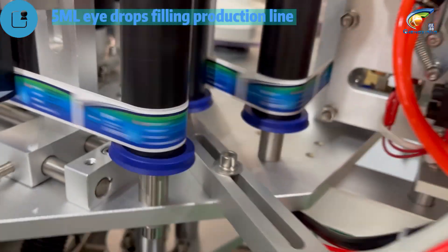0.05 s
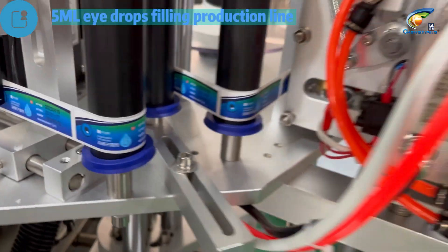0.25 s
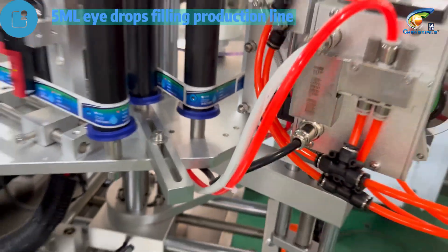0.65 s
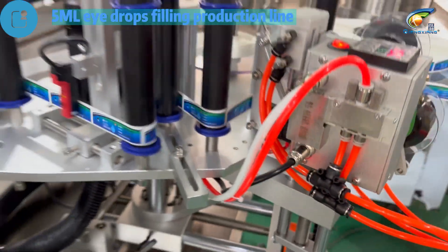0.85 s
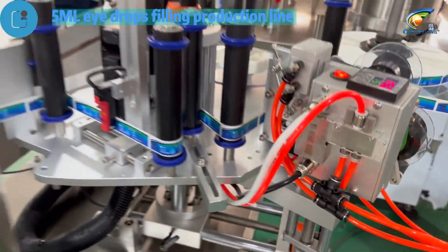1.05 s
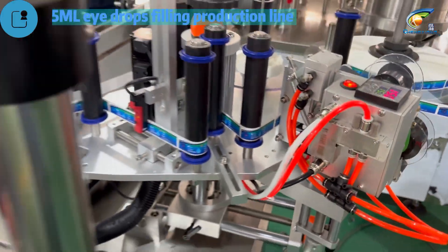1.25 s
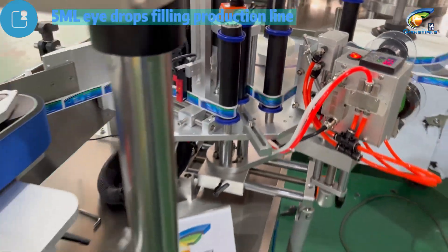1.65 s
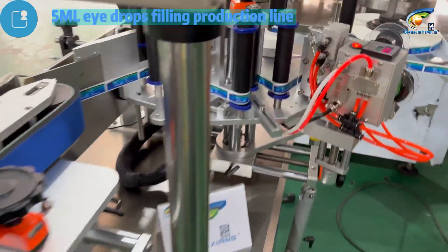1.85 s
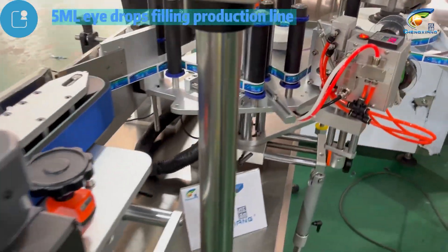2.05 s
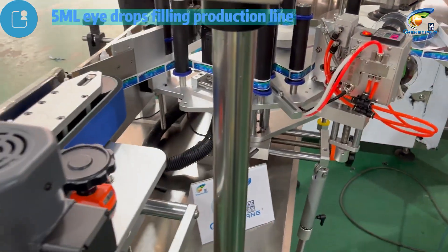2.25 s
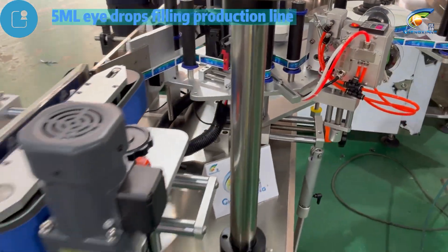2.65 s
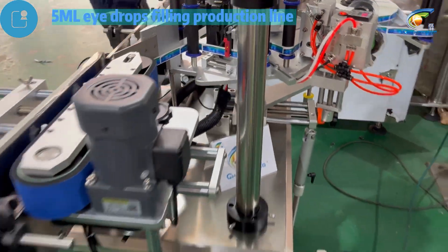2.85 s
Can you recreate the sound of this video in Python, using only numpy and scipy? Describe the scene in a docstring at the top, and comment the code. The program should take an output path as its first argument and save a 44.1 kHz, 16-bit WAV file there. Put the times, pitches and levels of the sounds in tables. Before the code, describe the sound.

A pneumatic labelling machine spits air and clacks in regular pairs over a factory hum.

```python
"""Label tape squeaks and hisses off its reel over the hum of a factory hall: a pneumatic labelling machine,
close to a stereo microphone, runs four cycles. In each, a valve spits air and a piston rattles out and
thuds; the valve spits again, the frame thumps and the piston clacks home on its ringing steel stop.
Small parts tick in between. A hollow knock follows the first cycle, a thin squeal the second,
and the hall echoes softly behind the machine."""
import sys
import numpy as np
from scipy import signal
from scipy.fft import rfft, irfft
from scipy.io import wavfile
from scipy.ndimage import uniform_filter1d

SR = 44100
rng = np.random.default_rng(int(sys.argv[2]) if len(sys.argv) > 2 else 0)


def int16_out(signal):
    """Quantize to a 16-bit WAV file."""
    q = np.round(np.clip(np.atleast_2d(signal).T, -1, 1) * 32767)
    wavfile.write(sys.argv[1], SR, q.astype(np.int16))


N = 127890

# hum of the hall (frequency [Hz], level [dB])
HUM_SPECTRUM = [(25, -43), (40, -5.5), (60, 1), (135, -0.5), (200, -8.5), (480, -7.5), (800, -13),
                (3800, -22), (6500, -30.5), (15000, -30.5), (16000, -54)]
# its rise and fall (time [s], level [dB])
HUM_LEVEL = [(0, -36.5), (.45, -44.5), (.72, -40), (1.2, -39.5), (1.6, -40), (2.5, -41.5), (2.75, -37.5),
             (2.9, -38)]
# dull bumps along the conveyor (time [s], level [dB])
BUMP_HITS = [(2.268, -37.5), (2.406, -30)]
# noise of a bump (frequency [Hz], level [dB])
BUMP_SPECTRUM = [(150, -45), (650, 19), (2200, 1), (12000, -58)]
# ticks of the mechanism (time [s], click [dB], ring [dB])
TICK_HITS = [(.2475, -28.5, -24), (.264, -34, -25), (.272, -41, -33), (.851, -32.5, -28), (1.014, -26, -27),
             (1.0205, -36, -31), (1.683, -32.5, -23), (1.835, -29, -28), (2.436, -32, -25)]
# click of a tick (frequency [Hz], level [dB])
TICK_SPECTRUM = [(300, -2.5), (3700, 3.5), (5000, -4.5), (15000, -5)]
# light metal parts that tick (frequency [Hz], level [dB], t60 [s])
SMALL_PART_MODES = [(2050, -6, .065), (2950, -13, .04), (3650, -11, .045)]
# tones of the squeal (frequency [Hz], level [dB])
SQUEAL_PARTIALS = [(1470, -52), (2121, -49), (2606, -53), (3376, -48), (3590, -51), (3948, -46),
                   (4091, -49), (6352, -53), (9380, -52), (9510, -52)]
# swell of the squeal (time [s], gain [dB])
SQUEAL_SWELL = [(1.16, -50), (1.19, 0), (1.34, 2), (1.42, -7), (1.58, -12), (1.68, -45)]
# hollow knock and its bounce (time [s], relative level [dB])
KNOCK_HITS = [(.5445, -12), (.607, -28)]
# ring of the knock (frequency [Hz], level [dB], t60 [s])
HOLLOW_MODES = [(447, -12, .11), (485, -22, .07), (954, 0, .075), (1075, -17, .06), (1206, -24, .08)]
# tape slipping on its rollers (time [s], length [s], start pitch [Hz], end pitch [Hz], level [dB])
TAPE_SQUEAKS = [(.03, 0.023, 3750, 4150, -43.5), (0.049, 0.019, 3890, 3400, -38.5),
                (0.111, .05, 3750, 3400, -44.5)]
# tape leaving the reel (frequency [Hz], level [dB])
TAPE_SPECTRUM = [(500, 2), (3500, -1.5), (15300, 3.5), (16000, -28)]
# thin hiss between strokes (time [s], level [dB])
IDLE_HISS_LEVEL = [(.28, -84), (.36, -57), (.5, -50.5), (.68, -66), (1.1, -41.5), (1.2, -42), (1.35, -51.5),
                   (1.5, -62), (2.3, -61.5), (2.6, -47.5)]
# outward strokes (time [s], air [dB], air treble [dB], thud [dB], relative slide [dB], tape [dB])
OUT_STROKES = [(0.2033, -18.5, -11, -12.5, -25.5, -41), (.9440, -15, -15, -14.5, -24.5, -43),
               (1.771, -17, -19.5, -16, -36, -47), (2.525, -20.5, -16, -19.5, -38.5, -50.5)]
# sliding piston (frequency [Hz], level [dB])
SLIDE_SPECTRUM = [(100, -13), (400, 9), (1200, 2.5), (3200, 0), (6000, -17.5), (15000, -17)]
# frame shoved by the piston (frequency [Hz], level [dB], t60 [s])
FRAME_SHOVE_MODES = [(55.5, -11, 0.17)]
# thud of the piston landing (frequency [Hz], level [dB], t60 [s])
LANDING_MODES = [(146.7, -8, 0.39), (307.2, -3, 0.099), (536, -11.5, 0.12), (886, -20, 0.038)]
# return strokes (time [s], air [dB], air treble [dB], air hold [s], thump [dB], clack delay [s],
# clack [dB], clack treble [dB], rebound gain [dB])
HOME_STROKES = [(0.3211, -14.5, -13.5, 0.0045, -11, .026, -12, -18, -12.5),
                (1.0622, -17, -18, 0.0027, -15.5, 0.025, -15.5, -17, -11),
                (1.8884, -22.5, -23, 0.006, -19, .026, -23, -22, -4.5),
                (2.642, -23, -21.5, 0.0057, -22, 0.025, -22.5, -24, -7)]
# frame ringing after the return (frequency [Hz], level [dB], t60 [s])
FRAME_RING_MODES = [(147.6, -22, 0.61)]
# piston clacking home (frequency [Hz], level [dB], t60 [s])
HOME_MODES = [(528, 3.5, 0.052), (598.6, -5, 0.19), (668, -2, 0.077), (838, -2.5, 0.077), (937, 8.5, 0.025),
              (1138, -2.5, 0.1)]
# steel stop (frequency [Hz], level [dB], t60 [s])
STEEL_STOP_MODES = [(1545, -8, 0.057), (1766, -21, .1), (1987, -6.5, 0.09), (2600, -15, .084),
                    (2824, -6.5, 0.088), (3380, -13, 0.048)]
# body of the clack (frequency [Hz], level [dB])
CLACK_SPECTRUM = [(100, 5), (600, 2), (1500, 1.5), (3000, -6), (6000, -31), (15000, -36)]
# bright edge of the clack (frequency [Hz], level [dB])
CLACK_TOP_SPECTRUM = [(700, 3), (2000, -1.5), (3200, 0.5), (7000, -0.5), (8500, 2), (15500, -11)]
# body of the air jet (frequency [Hz], level [dB])
AIR_SPECTRUM = [(100, -1.5), (350, 3.5), (900, -5.5), (2000, -8.5), (2900, 1.5), (6300, -3), (8300, 1),
                (11000, -20)]
# treble of the air jet (frequency [Hz], level [dB])
AIR_TOP_SPECTRUM = [(3000, -30.5), (9000, -8.5), (10500, -0.5), (14500, 4), (15500, 3), (16000, -35)]
# stereo width at the microphone (frequency [Hz], side against mid [dB])
STEREO_WIDTH = [(60, -26), (150, -16), (350, -11), (1100, 1), (2200, -6.5), (4500, -2.5), (9000, -20.5)]
# phase between the microphone ports (frequency [Hz], lead of the left [rad])
MIC_PHASE = [(0, 0), (4000, 0), (5100, 1.3), (6000, -.5), (8200, -3.14), (10700, -5.6), (12800, -6.7),
             (15200, -9.2)]
# balance of the microphone (frequency [Hz], left minus right [dB])
MIC_BALANCE = [(400, 0.3), (1350, -3), (1850, 0), (3900, .3), (5500, 2.6), (9000, -.5)]

ECHO_DB, ECHO_T60_S, ECHO_TREBLE_T60_S = -17.5, 0.92, 0.44
PLATE_LOW_HZ, PLATE_HIGH_HZ, PLATE_DAMP_HZ, PLATE_T60_S, PLATE_DB = 1202, 14100, 7000, 0.18, -8
TAPE_LEAD_S, TAPE_HOLD_S = 0.18, 0.21
SHOVE_DELAY_S, SLIDE_DELAY_S, THUD_DELAY_S, REBOUND_S = 0.0057, 0.015, 0.028, 0.016
AIR_RISE_S, OUT_AIR_HOLD_S, OUT_SPOOL_LEAD_S, HOME_SPOOL_LEAD_S = 0.00097, 0.0025, 0.0095, 0.013
HOME_TAIL_DB, HOME_KICK_DB = -5, -11.5
LOW_CUT_HZ, HIGH_CUT_HZ = 32, 16000


def undb(db):
    """Decibels to gain."""
    return 10 ** (np.asarray(db) / 20)


def clock():
    """Time of each sample."""
    return np.arange(N) / SR


def bins():
    """Frequencies of the spectrum, raised by 1 Hz to avoid zero."""
    return np.arange(N // 2 + 1) * SR / N + 1


def curve(points):
    """Gain that follows (time [s], level [dB]) points."""
    return undb(np.interp(clock(), *np.array(points).T))


def colour(points, hz):
    """Gain at hz along (frequency [Hz], level [dB]) points."""
    at, db = np.array(points).T
    return undb(np.interp(np.log(hz), np.log(at), db))


def noise(spectrum):
    """Stereo noise of rms 1 with the given spectral shape."""
    mid, side = rfft(rng.standard_normal((2, N))) * colour(spectrum, bins())
    side = side * colour(STEREO_WIDTH, bins())
    out = irfft(np.array([mid + side, mid - side]), N)
    return out / out.std()


def waver(per_s):
    """Smooth random wavering with a spread near 1."""
    step = int(SR / per_s)
    steps = np.repeat(rng.standard_normal(N // step + 1), step)
    return 1.19 * uniform_filter1d(uniform_filter1d(steps, step), step)[:N]


def burst(start, rise, hold, t60):
    """Envelope: linear attack, hold, exponential release."""
    t = clock() - start
    return np.clip(t / rise, 0, 1) * np.exp(-np.log(1000) * np.maximum(t - rise - hold, 0) / t60)


def ring(modes, start, rise):
    """Struck modes, slightly detuned at each hit; those near 1 kHz reach the two sides most out of step, the
    lowest and highest nearly in step."""
    t = clock()[:SR // 2]
    out, first = np.zeros((2, N + SR)), int(start * SR)
    for hz, db, t60 in modes:
        detune, skew, turn = rng.standard_normal(3)
        side_phase = np.array([[1], [-1]]) * np.tanh(skew) * colour(STEREO_WIDTH, hz)
        phase = side_phase + 2 * turn * min(hz / 1500, 1)
        envelope = undb(db) * np.exp(-np.log(1000) * t / t60) * np.minimum(t / rise, 1)
        tone = np.sin(2 * np.pi * hz * (1 + 0.00625 * detune) * t + phase)
        out[:, first:first + len(t)] += envelope * tone
    return out[:, :N]


def hall_hum():
    """Room tone of the hall: a low, gently wavering noise."""
    return noise(HUM_SPECTRUM) * curve(HUM_LEVEL) * undb(1.03 * waver(29.79))


def hall_echo(x):
    """Diffuse echo of the hall, faint this close to the machine; the treble dies sooner."""
    low = noise([(50, 4.5), (500, -5), (2000, -9.5), (5000, -9), (15000, -12.5)])
    high = 0.44 * noise([(1000, -69), (4000, 18), (15000, -27)])
    response = low * burst(0.0042, 0.019, 0, ECHO_T60_S) + high * burst(0.012, 0.019, 0, ECHO_TREBLE_T60_S)
    response /= np.linalg.norm(response, axis=1, keepdims=True)
    return undb(ECHO_DB) * signal.fftconvolve(x, response, axes=1)[:, :N]


def conveyor_bumps():
    """Dull bumps along the conveyor."""
    return sum(undb(db) * burst(s, 0.0022, 0.004, 0.11) for s, db in BUMP_HITS) * noise(BUMP_SPECTRUM)


def ticks():
    """Light metal parts click and ring briefly."""
    clicks = sum(undb(db) * burst(s, 0.00054, 0.0014, 0.048) for s, db, _ in TICK_HITS)
    clinks = sum(undb(db) * ring(SMALL_PART_MODES, s, 0.00071) for s, _, db in TICK_HITS)
    return clicks * noise(TICK_SPECTRUM) + clinks


def squeal():
    """Thin raspy metallic partials sing for half a second over a soft rubbing noise."""
    out = undb(-44.5) * noise([(300, -21), (1350, 7.5), (3900, -1), (5000, -3), (9600, -5), (15000, -26)])
    for hz, db in SQUEAL_PARTIALS:
        phase = 2 * np.pi * np.cumsum(hz * (1 + 0.011 * waver(700))) / SR
        rasp_db = 3.5 * waver(400)
        out += undb(db + rasp_db) * np.sin(phase + rng.uniform(-1, 1, (2, 1)))
    return out * curve(SQUEAL_SWELL)


def hollow_knock():
    """A hollow knock with a short crack, and its faint bounce."""
    envelope = sum(undb(db - 15.5) * burst(s - 0.001, 0.00045, 0.002, 0.21) for s, db in KNOCK_HITS)
    crack = envelope * noise([(200, 1.5), (1200, 3.5), (6000, -12.5), (15000, -15.5)])
    return crack + sum(undb(db + 7) * ring(HOLLOW_MODES, s, rise=0.006) for s, db in KNOCK_HITS)


def tape_squeaks():
    """The tape slips on a roller: short rough glides that swell and fade."""
    out = 0
    for s, length, start_hz, end_hz, db in TAPE_SQUEAKS:
        along = np.clip((clock() - s) / length, 0, 1)
        hz = (start_hz + (end_hz - start_hz) * along) * (1 + 0.029 * waver(900))
        out += undb(db) * np.sin(np.pi * along) * np.sin(2 * np.pi * np.cumsum(hz) / SR)
    return out


def tape_hiss():
    """Tape runs off the reel ahead of each outward stroke; a thin hiss lingers in between."""
    feed = sum(undb(db) * burst(s - TAPE_LEAD_S, 0.018, TAPE_HOLD_S, 0.15) for s, *_, db in OUT_STROKES)
    flutter = undb(2.7 * waver(70))
    return (feed + curve(IDLE_HISS_LEVEL)) * flutter * noise(TAPE_SPECTRUM)


def with_plates(x, count=110):
    """Adds the brief ring of the machine's steel plates: many close modes, the highest dying first."""
    places = (np.arange(count) + rng.random(count)) / count
    pitches = PLATE_LOW_HZ + (PLATE_HIGH_HZ - PLATE_LOW_HZ) * places ** 1.4
    modes = [(hz, 0, PLATE_T60_S / np.hypot(1, (hz / PLATE_DAMP_HZ) ** 2)) for hz in pitches]
    response = ring(modes, 0, 0.0012)[:, :SR // 2]
    response /= np.linalg.norm(response, axis=1, keepdims=True)
    return x + undb(PLATE_DB) * signal.fftconvolve(x, response, axes=1)[:, :N]


def rattle(per_s=150, decay_s=0.0037):
    """Envelope of rms 1: little impacts at uneven gaps, each dying in a few milliseconds."""
    jitter, softness = rng.random((int(N / SR * per_s), 2)).T
    times = (np.arange(len(jitter)) + jitter) / per_s
    hits = np.zeros(N)
    hits[(times * SR).astype(int)] = undb(-14 * softness)
    out = signal.lfilter([1], [1, -np.exp(-1 / (decay_s * SR))], hits)
    return out / np.sqrt(np.mean(out ** 2))


def low_thump(start, start_hz=192.3, end_hz=51.4, fall_s=0.012):
    """A low thump, heard with a quickly falling pitch."""
    t = np.maximum(clock() - start, 0)
    hz = end_hz + (start_hz - end_hz) * np.exp(-t / fall_s)
    phase = 2 * np.pi * np.cumsum(hz * (t > 0)) / SR
    return undb(-2.5) * burst(start, 0.0079, 0.0011, 0.11) * np.sin(phase)


def piston_out():
    """Tape feeds; the piston shoves the frame, rattles outward and lands with a rough thud."""
    thuds = slide = crunch = 0
    for s, _, _, thud_db, slide_db, _ in OUT_STROKES:
        landing = ring(LANDING_MODES, s + THUD_DELAY_S, 0.0071)
        shove = ring(FRAME_SHOVE_MODES, s + SHOVE_DELAY_S, 0.012)
        thuds += undb(thud_db) * (landing + shove)
        slide += undb(slide_db - 2.5) * burst(s + SLIDE_DELAY_S, 0.012, 0.013, 0.23)
        crunch += undb(thud_db - 15) * burst(s + THUD_DELAY_S, 0.0041, 0, 0.13)
    tape = tape_hiss()
    thuds += crunch * noise([(60, -4), (240, 1), (450, -1.5), (8000, -73)])
    return thuds + with_plates(slide * rattle() * noise(SLIDE_SPECTRUM) + tape)


def piston_home():
    """The frame thumps as the piston starts back; it hits its steel stop, which rings, and rebounds once."""
    out = body = top = 0
    for s, _, _, _, thump_db, delay, clack_db, treble_db, rebound_db in HOME_STROKES:
        impact = s + delay
        out += undb(thump_db) * (low_thump(s + 0.0015) + ring(FRAME_RING_MODES, impact, 0.0055))
        for at, gain, stop_db in ((impact, 1, -3), (impact + REBOUND_S, undb(rebound_db), 1)):
            clack = undb(-3.5) * gain ** 0.5 * ring(HOME_MODES, at, 0.0016)
            stop = undb(stop_db) * ring(STEEL_STOP_MODES, at, 0.001)
            out += gain * undb(clack_db) * (clack + stop)
            body += gain * undb(clack_db - 5) * burst(at, 0.00076, 0.00088, 0.055)
            top += gain * undb(treble_db) * burst(at, 0.0029, 0.0025, 0.039)
    return out + body * noise(CLACK_SPECTRUM) + top * noise(CLACK_TOP_SPECTRUM)


def spit(start, hold, t60, tail_db, tail_t60):
    """Envelope of a shot of air: a sharp jet, then a weaker trailing hiss."""
    jet = burst(start, AIR_RISE_S, hold, t60)
    return np.maximum(jet, undb(tail_db) * burst(start, AIR_RISE_S, 0, tail_t60))


def air_valve():
    """The spool ticks, then air spits out; the return shot is drier and kicks the housing."""
    shots = [(s, db, treble, OUT_AIR_HOLD_S, OUT_SPOOL_LEAD_S, 0) for s, db, treble, *_ in OUT_STROKES]
    shots += [(*stroke[:4], HOME_SPOOL_LEAD_S, HOME_TAIL_DB) for stroke in HOME_STROKES]
    body = top = 0
    for s, db, treble_db, hold, lead, tail_db in shots:
        spool = undb(-13) * burst(s - lead, 0.001, 0.0031, 0.026)
        body += undb(db) * (spool + spit(s, hold, 0.031, tail_db - 12.5, tail_t60=0.18))
        top += undb(treble_db) * (spool / 2 + spit(s, hold, 0.019, tail_db - 14.5, tail_t60=0.15))
    kick = sum(undb(db + HOME_KICK_DB) * burst(s, AIR_RISE_S, 0, 0.1) for s, db, *_ in HOME_STROKES)
    return body * noise(AIR_SPECTRUM) + top * noise(AIR_TOP_SPECTRUM) + kick * noise(CLACK_SPECTRUM)


def scene():
    """The machine close up, with the echo and hum of the hall behind it."""
    machine = with_plates(air_valve()) + piston_out() + piston_home()
    machine += ticks() + conveyor_bumps() + tape_squeaks() + squeal()
    knock = hollow_knock()
    into_hall = (machine + 0.4 * knock).mean(axis=0, keepdims=True)  # the knock sounds drier
    return hall_hum() + hall_echo(into_hall) + knock + machine


def record(dry):
    """The two microphone ports differ in level and phase; deep bass and top are cut, peaks rounded."""
    phase = np.interp(bins(), *np.array(MIC_PHASE).T)
    left_port = np.sqrt(colour(MIC_BALANCE, bins())) * np.exp(0.5j * phase)
    heard = irfft(rfft(dry) * np.array([left_port, 1 / left_port]), N)
    low_cut = signal.butter(2, LOW_CUT_HZ, "high", fs=SR, output="sos")
    high_cut = signal.ellip(8, 0.2, 70, HIGH_CUT_HZ, fs=SR, output="sos")
    rounded = np.tanh(signal.sosfilt(low_cut, heard))
    return signal.sosfilt(high_cut, rounded)


dry = scene()
out = record(dry)
int16_out(out)
```